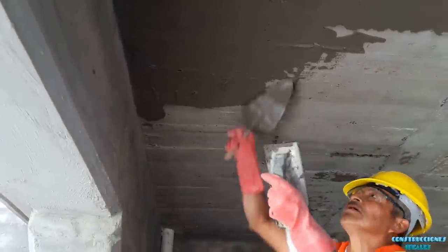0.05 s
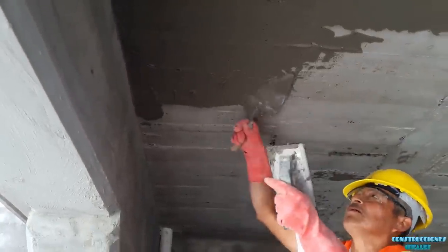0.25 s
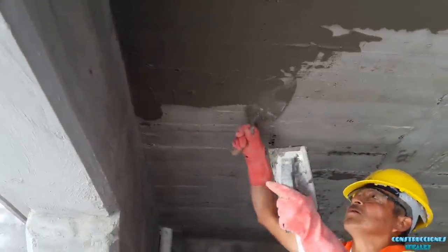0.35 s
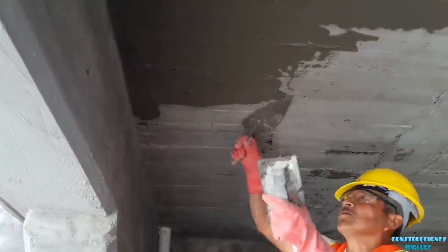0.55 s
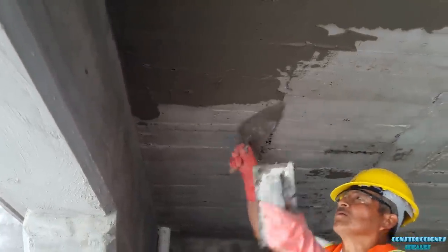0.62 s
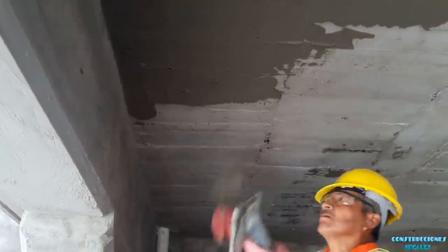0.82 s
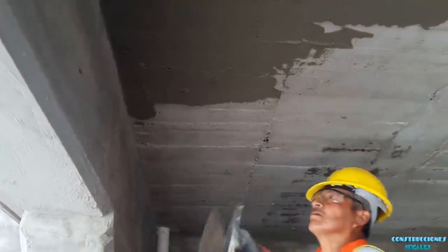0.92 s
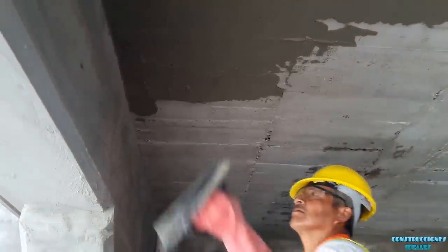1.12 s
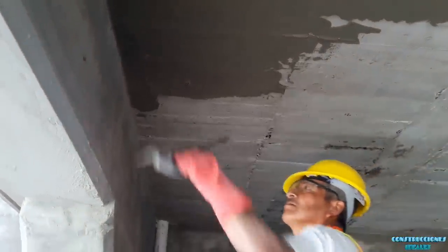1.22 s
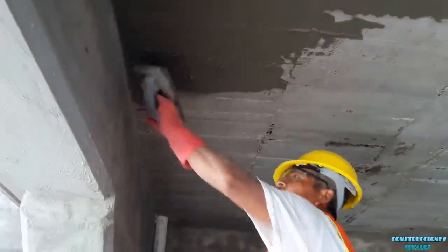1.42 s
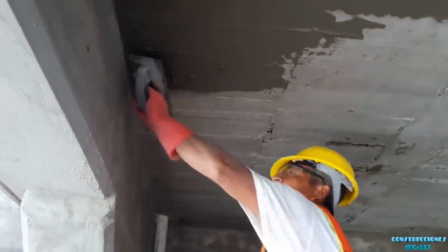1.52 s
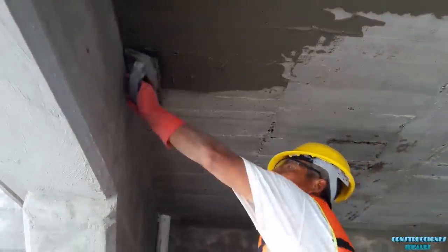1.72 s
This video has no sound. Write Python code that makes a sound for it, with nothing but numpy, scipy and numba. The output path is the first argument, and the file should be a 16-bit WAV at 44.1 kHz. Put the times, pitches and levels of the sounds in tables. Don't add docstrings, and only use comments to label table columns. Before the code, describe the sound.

A steel trowel slaps wet mortar onto a concrete ceiling, scrapes grittily, then rings off faintly

```python
import sys
import numpy as np
from scipy import signal
from scipy.fft import rfft, irfft
from scipy.io import wavfile
from scipy.ndimage import uniform_filter1d
from numba import njit

SR = 44100
rng = np.random.default_rng(int(sys.argv[2]) if len(sys.argv) > 2 else 0)


def amplitude_ratio(level_db):
    exponent = np.asarray(level_db, float) / 20
    return 10 ** exponent


def pcm_store(signal):
    levels = np.round(np.clip(np.atleast_2d(signal), -1, 1) * 32767)
    wavfile.write(sys.argv[1], SR, levels.astype(np.int16).T)


N = 77175
T = np.arange(N) / SR
GRIT_PER_S, GRIT_SCATTER_DB = 14000, 1.5


def unit(x):
    return x / np.sqrt(np.mean(x ** 2))


def peak(x, db):
    return x * amplitude_ratio(db) / np.abs(x).max()


def colour(x, points):
    hz, db = np.array(points, float).T
    curve_db = np.interp(np.log(np.fft.rfftfreq(4096, 1 / SR) + 1), np.log(hz), db)
    cepstrum = irfft(curve_db * np.log(10) / 20)
    cepstrum[1:2048] *= 2
    cepstrum[2049:] = 0
    return signal.fftconvolve(x, irfft(np.exp(rfft(cepstrum))))[:N]


@njit
def ring(x, hz, fade, rate):
    y, z = np.empty(len(x)), 0j
    for i in range(len(x)):
        z = z * np.exp(2j * np.pi * hz[i] / rate - fade[i] / rate) + x[i]
        y[i] = z.imag
    return y


def body(x, modes, bend=1., extra=0.):
    one = np.ones(N)
    total = 0
    for k, (hz, db, t60) in enumerate(modes):
        fade = (np.log(1000) / max(t60, .004) + extra) * one
        total = total + (-1) ** k * amplitude_ratio(db) * ring(x, hz * bend * one, fade, 1. * SR)
    return total


def walk(rate):
    k = int(SR / rate)
    held = np.repeat(rng.standard_normal(N // k + 1), k)[:N]
    return unit(uniform_filter1d(held, k))


def burst(start, hold, fade):
    u = T - start
    return np.clip(u / 0.0007, 0, 1) * np.exp(-np.clip(u - hold, 0, None) / max(fade, .0003))


def blow(start, width):
    return np.exp(-((T - start) / width) ** 2)


def grit(rate, scatter_db):
    draw = rng.random((N, 2)).T
    size_db = np.minimum(-scatter_db * np.log(1 - draw[1]), 3 * scatter_db)
    return unit((draw[0] < rate / SR) * rng.standard_normal(N) * amplitude_ratio(size_db))


# [Hz, dB per Hz]
SITE_SPECTRUM = [(15, -29), (25, -32), (70, -6), (157, -3.5), (263, -8.5), (354, -8.5), (818, -15),
                 (2000, -23.5), (16000, -56)]
# [Hz, dB]
SITE_WIDTH = [(30, -3), (70, -7), (125, -17), (500, -6), (1500, -2), (16000, 0)]
# [s, dB]
TRAFFIC_LEVEL = [
    (0, -49),
    (.2, -48.5),
    (.6, -46.5),
    (1.1, -46),
    (1.4, -46.5),
    (1.75, -50),
]


def site():
    mid = colour(rng.standard_normal(N), SITE_SPECTRUM)
    side = colour(colour(rng.standard_normal(N), SITE_SPECTRUM), SITE_WIDTH)
    level_db = np.interp(T, *np.array(TRAFFIC_LEVEL).T) + walk(9)
    return np.array([mid + side, mid - side]) / np.sqrt(np.mean(mid ** 2)) * amplitude_ratio(level_db)


# [Hz, dB, s]
SLAP_MODES = [(416, -15, 0.061), (1266, -3, 0.074), (1420, 0.5, 0.039), (1657, 3.5, 0.041),
              (1745, -7, 0.089), (2088, 3, 0.11), (2360, -7, 0.12), (2770, -6, 0.073), (4020, -3, 0.012),
              (4670, -25, .04)]
# [s, dB]
HEEL_BLOWS = [
    (.230, -5),
    (.2345, 4),
    (0.24, -3.5),
]
# [Hz, dB, s]
PLATE_HUM = (780, -25.5, 0.13)
# [Hz, dB per Hz]
SPLAT_SPECTRUM = [(59, -68), (100, -21), (300, -5), (620, -13), (1150, -5.5), (2080, -0.5), (2520, -9),
                  (16000, -24)]


def slap():
    slap_s, puff_s, puff_hz = .2205, 0.21, 59.4
    env = burst(slap_s, 0.0034, 0.047)
    toe = blow(slap_s + 0.001957, .0001)
    heel = sum(amplitude_ratio(db) * blow(start, .0001) for start, db in HEEL_BLOWS)
    force = env * grit(GRIT_PER_S, GRIT_SCATTER_DB) + 8 * (toe + heel)
    knock = peak(body(force, SLAP_MODES), -16.5)
    hum_hz, hum_db, hum_t60 = PLATE_HUM
    hum = peak(body(blow(slap_s + 0.0023, .0001), [(hum_hz, 0, hum_t60)]), hum_db)
    splat = peak(colour(env * rng.standard_normal(N), SPLAT_SPECTRUM), -17)
    puff = amplitude_ratio(-44) * blow(puff_s, 0.029) * np.cos(2 * np.pi * puff_hz * (T - puff_s))
    return knock + hum + splat + puff


# [s, dB, Hz, dB, 0-1]
STROKE = [(.3, -59, 2200, -4, 0.27), (0.34, -43, 2270, 1.5, 0.3), (.39, -33.5, 2510, 3, 0.24),
          (.45, -34, 2420, 6.5, 0.33), (.49, -40, 2270, 1, 0.22), (.56, -35, 2180, -3, 0.6),
          (.61, -32.5, 2610, 6.5, 0.29), (0.634, -34.5, 2010, -12, 0.7), (0.646, -31.5, 2220, 3.5, 0.34),
          (.675, -33, 2520, 6, 0.39), (0.715, -35, 2760, 5, 0.76), (.732, -37, 2870, -16, 0.6),
          (0.753, -36.5, 2700, -13, 0.34), (0.778, -44.5, 2800, -3, 0.6), (.82, -83, 2750, -10, 0.5)]
# [s, dB, s, Hz, dB]
STONE_JOLTS = [(0.348, -29, 0.0013, 1530, -27), (0.36, -30, 0.0029, 2180, -33),
               (0.382, -44, 0.0028, 3700, -27), (0.3887, -25.5, 0.0019, 5014, -21.5),
               (.404, -45, 0.0023, 2520, -21), (0.406, -33.5, 0.0062, 1570, -19.5),
               (0.418, -44, 0.0027, 1590, -22), (0.433, -45, 0.0011, 1508, -19),
               (0.453, -53, 0.0017, 1586, -33), (0.4613, -22, 0.0029, 1525, -18),
               (0.4619, -36, 0.0013, 4190, -19), (0.473, -28.5, 0.0038, 2263, -24.5),
               (0.483, -30, 0.0022, 1494, -20), (.498, -40, .002, 1450, -25),
               (0.5098, -32, .003, 1570, -21.5), (0.527, -36, 0.0025, 3700, -27.5),
               (0.587, -49, 0.0032, 5360, -31), (0.602, -37.5, 0.011, 2350, -28.5),
               (0.6436, -33, 0.003, 1790, -22), (0.658, -45, 0.0045, 2250, -25),
               (0.665, -48, 0.0021, 1700, -28), (0.486, -54, 0.0071, 795, -25),
               (0.666, -54, 0.0059, 8000, -26.5), (.682, -45, 0.0025, 4930, -25),
               (0.712, -34, .004, 1570, -19), (0.719, -30.5, .004, 1660, -21),
               (0.723, -36, 0.0013, 2543, -22), (0.737, -38.5, 0.0038, 5300, -28)]
# [Hz, dB, s]
BLADE_MODES = [(587, -14, 0.48), (786, -15.5, 0.31), (887, -14, 1), (1040, -20, 0.19), (1479, -10.5, 0.19),
               (1542, -2.5, 0.27), (1578, 0, 0.23), (1700, -4, 0.12), (1940, -23, 0.2), (2313, 0, 0.12),
               (2420, -12, 0.21), (2602, -6, 0.22), (3700, -20, 0.14), (5300, -10, 0.23)]
# [Hz, dB per Hz]
RASP_SPECTRUM = [(300, -24.5), (600, -12), (1200, -9), (1600, -7), (2300, -3), (3200, -1.5), (5500, -4),
                 (16000, -22)]


def drag():
    t, pressure_db, edge_hz, edge_db, damping = np.array(STROKE).T
    chatter_db = 1.2 * walk(45)
    steady = amplitude_ratio(np.interp(T, t, pressure_db, left=-120, right=-120) + chatter_db)
    sand = grit(GRIT_PER_S, GRIT_SCATTER_DB)
    push, kicks, pings = sand * steady, 0, 0
    for start, db, length, ping_hz, ping_db in STONE_JOLTS:
        push = push + amplitude_ratio(db) * burst(start, 0, length) * sand
        kicks = kicks + amplitude_ratio(db + 14) * (np.arange(N) == int(start * SR))
        strike = burst(start - .001, 0, length / 2) * np.sin(2 * np.pi * ping_hz * T)
        pings = pings + peak(body(strike, [(ping_hz, 0, .013)]), ping_db)
    scale = np.sqrt(np.mean(push ** 2))

    damp = np.interp(T, t, damping)
    loss = np.clip(damp, 0, 2) * np.log(1000) / .03
    flex = 1 + .06 * np.clip(damp - .1, 0, .4) * walk(35)
    blade = unit(body(push + kicks, BLADE_MODES, flex, loss))

    edge_modes = [(0.94, 1, .01), (.84, 0.5, .01), (0.75, -1.5, .01)]  # (pitch ratio, dB, t60 s)
    edge_push = push * amplitude_ratio(np.interp(T, t, edge_db))
    edge = unit(body(edge_push, edge_modes, np.interp(T, t, edge_hz)))

    spectrum, hz = rfft(unit(colour(push, RASP_SPECTRUM))), np.fft.rfftfreq(N, 1 / SR)
    bounds = 17000 * 2. ** np.arange(-6, .1, .5)
    rasp = 0
    for low, high in zip(bounds, bounds[1:]):
        band = irfft(spectrum * (hz >= low) * (hz < high), N)
        rasp = rasp + band * amplitude_ratio(1.5 * walk(30))
    thin = signal.butter(2, 900, "high", fs=SR, output="sos")
    scrape = amplitude_ratio(-.6) * blade + amplitude_ratio(1.5) * edge + amplitude_ratio(2.5) * unit(rasp)
    return scale * scrape + signal.sosfilt(thin, pings)


# [Hz, dB, s]
FREE_MODES = [(1546, -4.5, 0.23), (1577, 2.5, 0.17), (889, -15, 0.3), (1066, -13.5, 0.31),
              (2460, -17, 0.23), (2060, -8.5, 0.21)]


def lift():
    return peak(body(blow(.739, .0001), FREE_MODES), -19.5)


# [s, dB]
SCOOP_LEVEL = [
    (.8, -106),
    (0.898, -49.5),
    (1.05, -48.5),
    (1.14, -51),
    (1.19, -57.5),
    (1.229, -46),
    (1.33, -54),
    (1.45, -63),
    (1.71, -76),
    (1.75, -49),
]
# [Hz, dB per Hz]
SLURP_SPECTRUM = [(290, -25), (500, 4.5), (831, -9), (880, -17), (1080, 0), (2610, -6), (16000, -22.5)]
# [s, dB, Hz]
CRUMB_FALLS = [
    (1.245, -49, 2630),
    (1.463, -39.5, 1940),
    (1.535, -37.5, 1530),
    (1.544, -43, 1650),
    (1.742, -42, 1180),
]
# [ratio, dB, s]
CRUMB_MODES = [(1., 0, .008), (1.3, -3, .006), (.75, -5, .006)]


def scoop():
    t, db = np.array(SCOOP_LEVEL).T
    level_db = np.interp(T, t, db, left=-120) + 1.9 * walk(30.46)
    sound = unit(colour(grit(4000, 0.79), SLURP_SPECTRUM)) * amplitude_ratio(level_db)
    for start, crumb_db, pitch_hz in CRUMB_FALLS:
        hit = burst(start, 0, 0.0013) * rng.standard_normal(N)
        sound = sound + peak(body(hit, CRUMB_MODES, pitch_hz), crumb_db)
    return sound


# [Hz, dB, s]
HAWK_MODES = [(303, -12, 0.094), (471, -9, 0.081), (580, 1.5, 0.093), (834, -3, 0.051), (1020, -10, .04),
              (1272, -1, 0.054), (1450, -5, 0.056), (1770, -2, 0.061), (2297, 4, 0.065), (2730, 3, 0.03)]
# [Hz, dB per Hz]
SHUDDER_SPECTRUM = [(120, -55), (300, -13), (590, -8), (800, -13), (1800, -12.5), (2500, -18),
                    (3200, -30.5), (16000, -41)]


def tap():
    tap_s, rebound_s = .9837, 1.0002
    crack = burst(tap_s, 0, 0.0037) * rng.standard_normal(N)
    shudder = colour(burst(tap_s, 0, 0.036) * rng.standard_normal(N), SHUDDER_SPECTRUM)
    force = blow(tap_s, .00008) + amplitude_ratio(-6.5) * blow(rebound_s, 0.00029)
    return peak(body(force, HAWK_MODES), -21) + peak(crack, -30) + peak(shudder, -24)


# [Hz, dB, s]
BOARD_MODES = [(114, -12, 0.044), (245.6, 2, 0.087), (297, -0.5, 0.082), (317, 0.5, 0.048),
               (667, -1.5, 0.066)]
# [s, dB]
LUMP_THUDS = [
    (1.208, -30.5),
    (1.224, -36),
    (1.246, -48),
    (1.267, -36.5),
    (1.305, -49),
]


def lump():
    force = sum(amplitude_ratio(db) * blow(start + .001, .0007) for start, db in LUMP_THUDS)
    return peak(body(force, BOARD_MODES), LUMP_THUDS[0][1] + 5)


def room(x):
    t60_s, high_t60_s, level_db, side_db = 0.52, 0.42, -9, -2.5
    u = T[:SR]
    noise = rng.standard_normal((2, SR))
    low = signal.sosfilt(signal.butter(1, 2500, fs=SR, output="sos"), noise)
    tail = low * amplitude_ratio(-60 * u / t60_s) + (noise - low) * amplitude_ratio(-60 * u / high_t60_s)
    tail = tail * np.clip(u / 0.0097, 0, 1)
    tail = tail / np.sqrt(np.sum(tail[0] ** 2))
    mid, side = (signal.fftconvolve(x, h)[:N] for h in tail)
    side = side - signal.sosfilt(signal.butter(1, 400, fs=SR, output="sos"), side)
    side = amplitude_ratio(side_db) * side
    return amplitude_ratio(level_db) * np.array([mid + side, mid - side])


def scatter(near):
    u = T[:2000]
    echoes = rng.standard_normal(len(u)) * np.exp(-u / .05)
    side = signal.fftconvolve(near, echoes / np.sqrt(np.sum(echoes ** 2)))[:N]
    return amplitude_ratio(.3) * signal.sosfilt(signal.butter(1, 2000, "high", fs=SR, output="sos"), side)


def scene():
    near = slap() + drag() + lift() + scoop() + tap() + lump()
    side = scatter(near)
    return np.array([near + side, near - side]) + room(near) + site()


def roll_off(x):
    return signal.sosfilt(signal.butter(12, 16640, fs=SR, output="sos"), x)


# [Hz, dB]
MIC_RESPONSE = [(100, 0.5), (7000, -2), (9600, -5.5), (12500, -1), (15000, -3)]


def record(dry):
    noisy = dry + amplitude_ratio(-65.5) * rng.standard_normal(dry.shape)
    x = np.array([colour(channel, MIC_RESPONSE) for channel in noisy])
    top = signal.ellip(14, .3, 90, 16000, fs=SR, output="sos")
    return roll_off(signal.sosfilt(top, x))


dry = scene()
out = record(dry)
pcm_store(out)
```